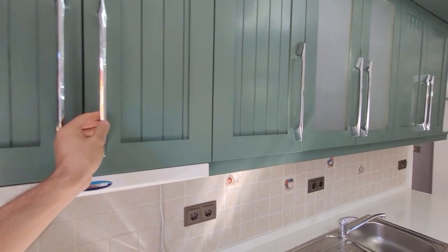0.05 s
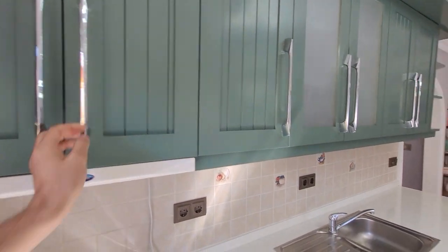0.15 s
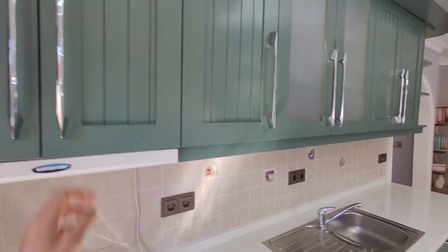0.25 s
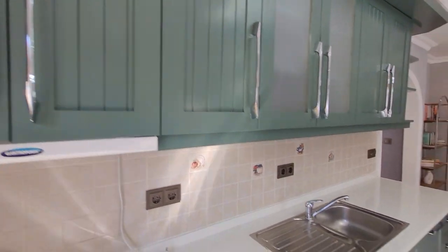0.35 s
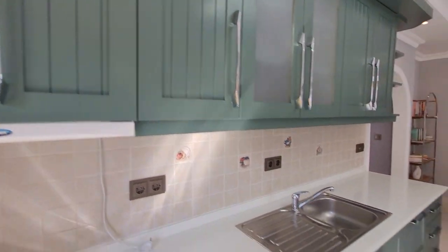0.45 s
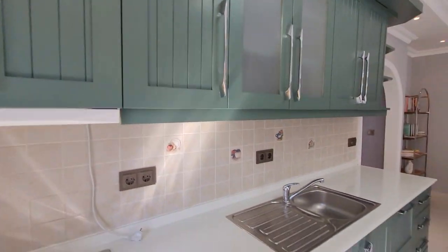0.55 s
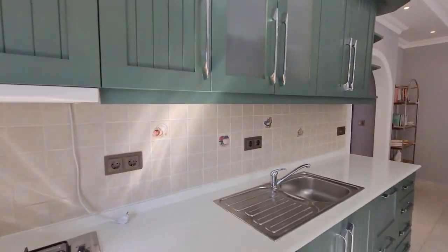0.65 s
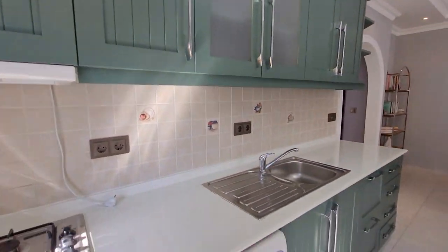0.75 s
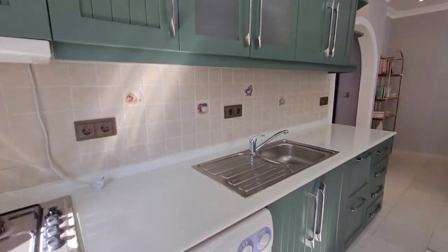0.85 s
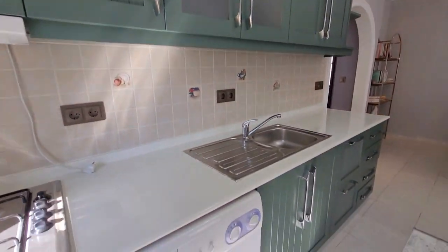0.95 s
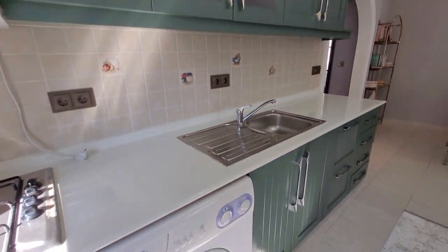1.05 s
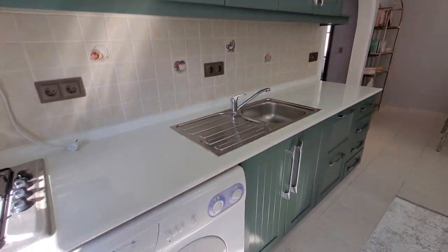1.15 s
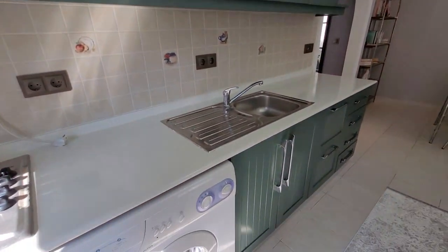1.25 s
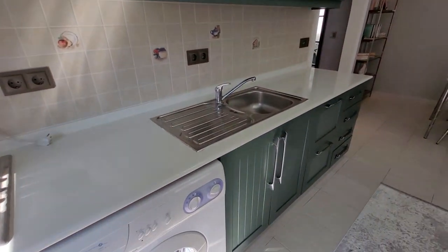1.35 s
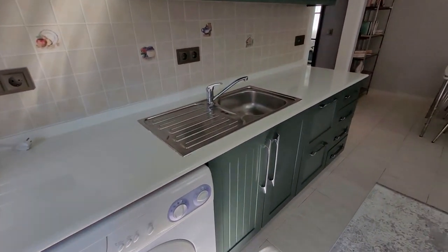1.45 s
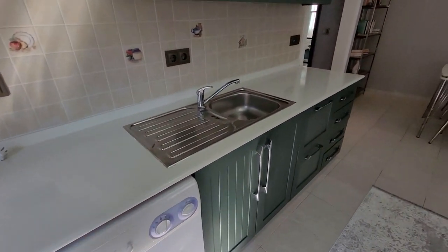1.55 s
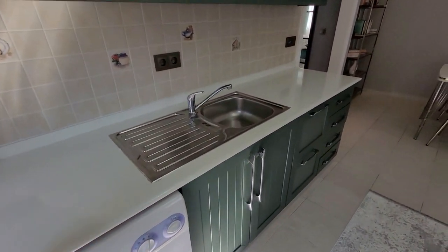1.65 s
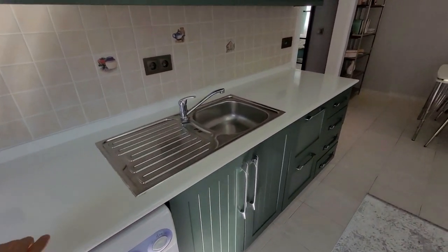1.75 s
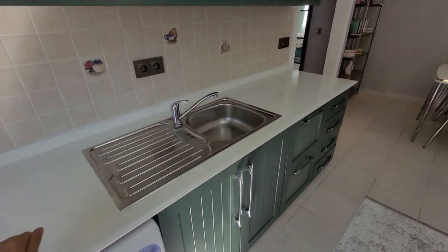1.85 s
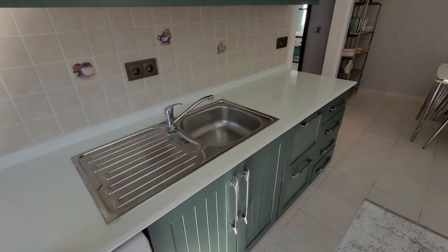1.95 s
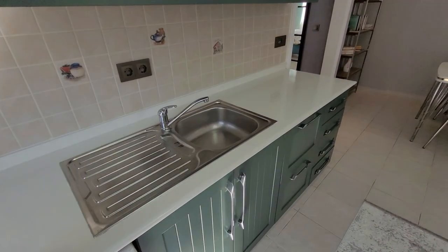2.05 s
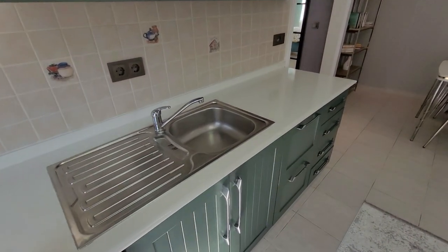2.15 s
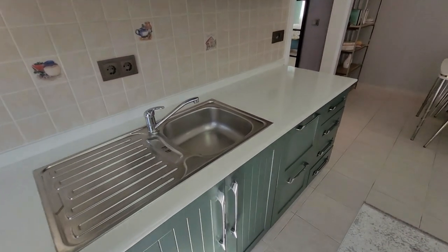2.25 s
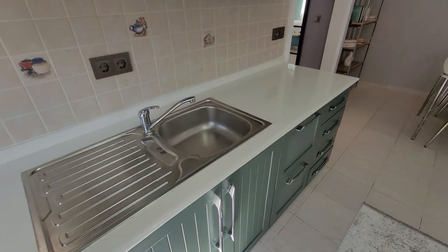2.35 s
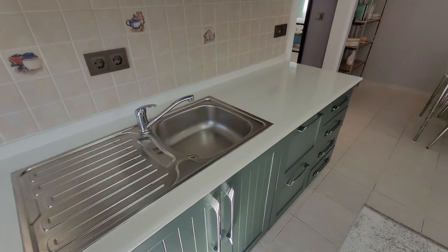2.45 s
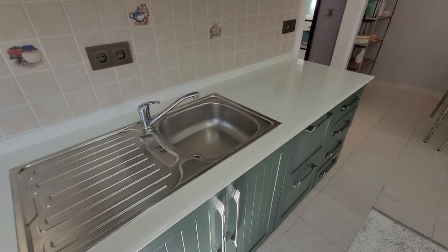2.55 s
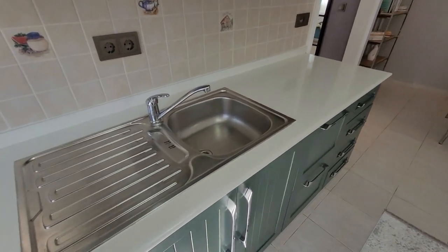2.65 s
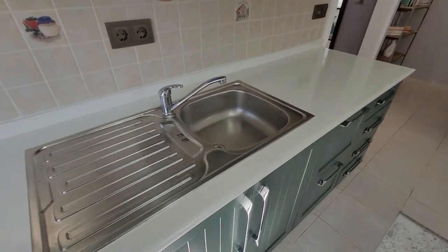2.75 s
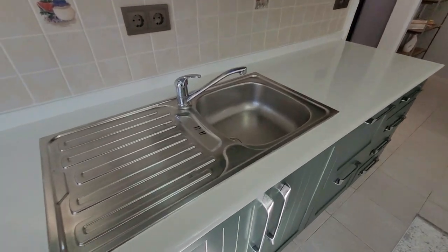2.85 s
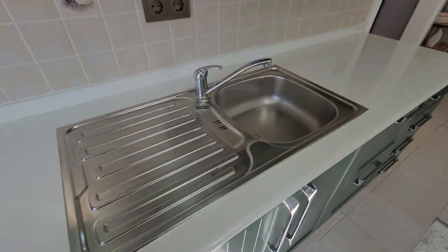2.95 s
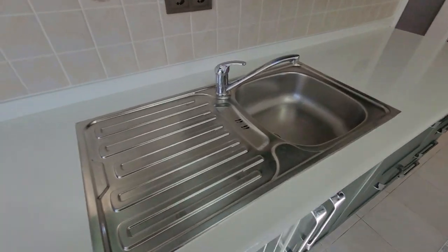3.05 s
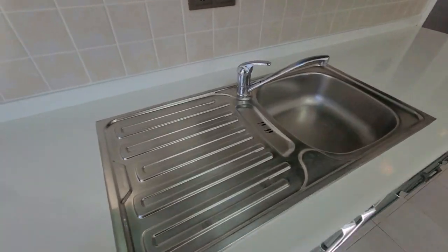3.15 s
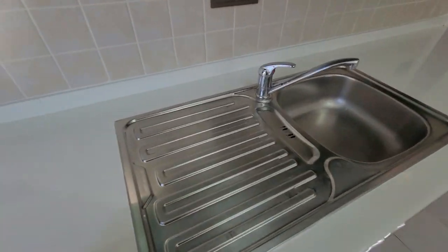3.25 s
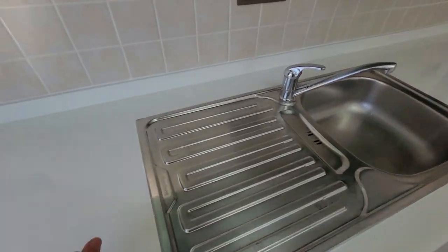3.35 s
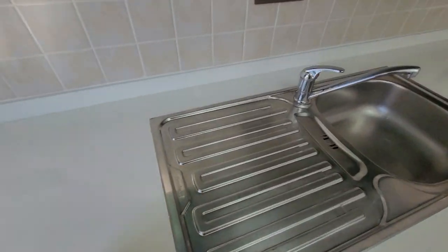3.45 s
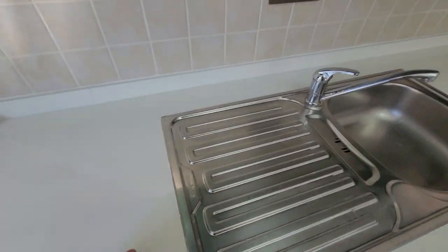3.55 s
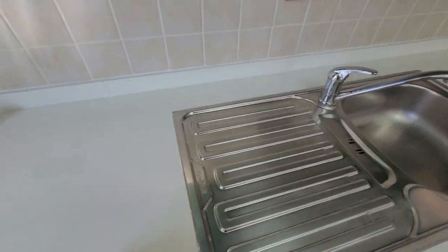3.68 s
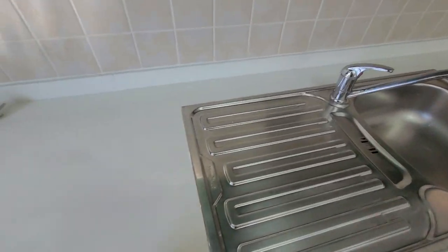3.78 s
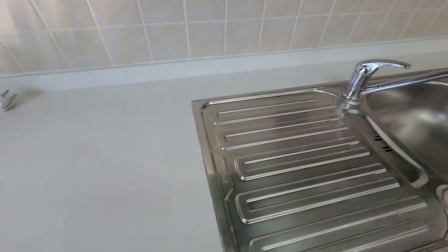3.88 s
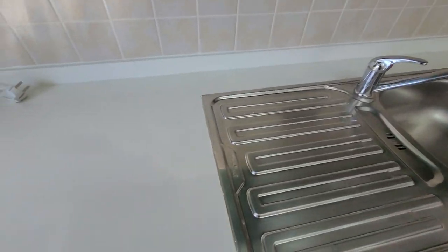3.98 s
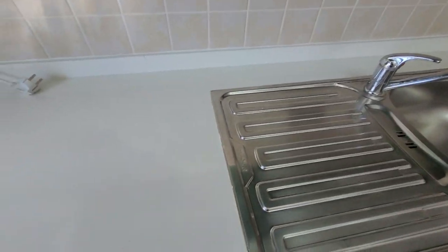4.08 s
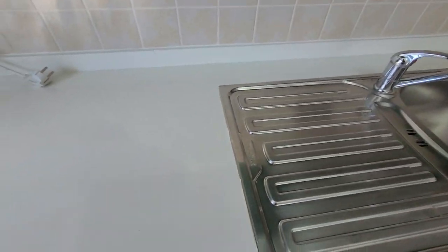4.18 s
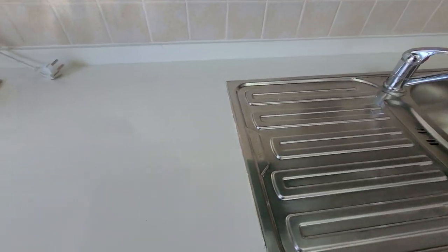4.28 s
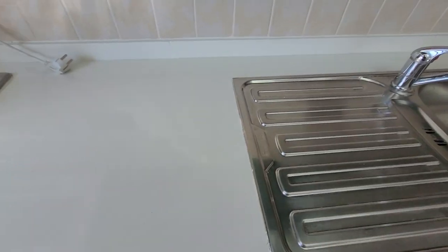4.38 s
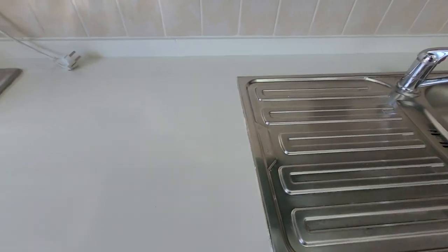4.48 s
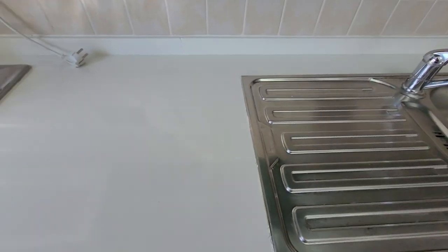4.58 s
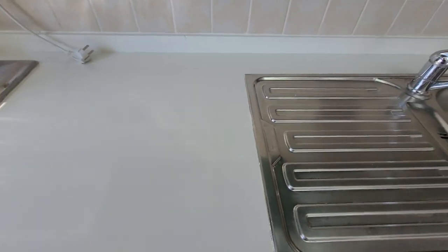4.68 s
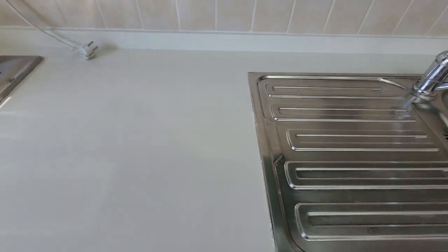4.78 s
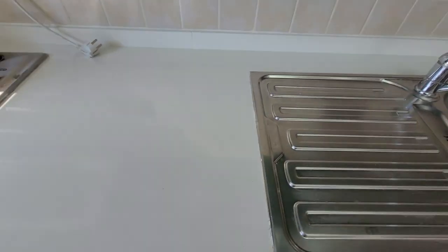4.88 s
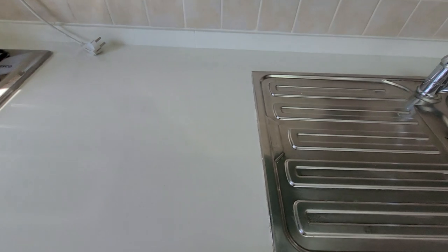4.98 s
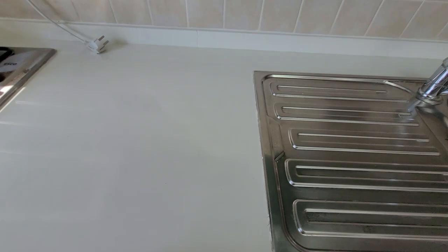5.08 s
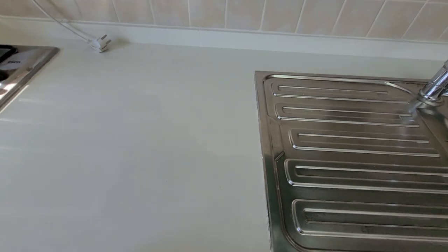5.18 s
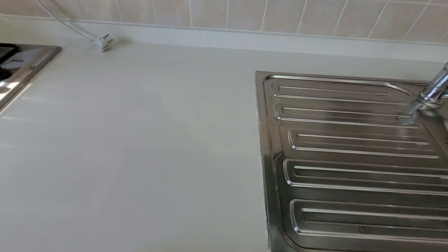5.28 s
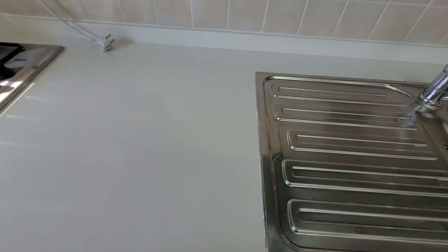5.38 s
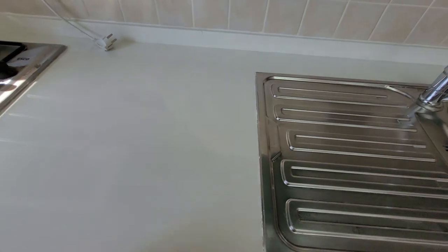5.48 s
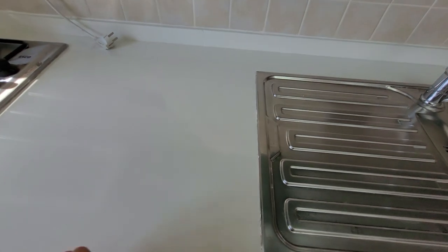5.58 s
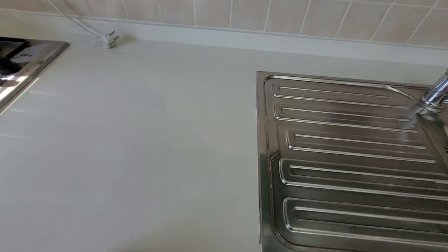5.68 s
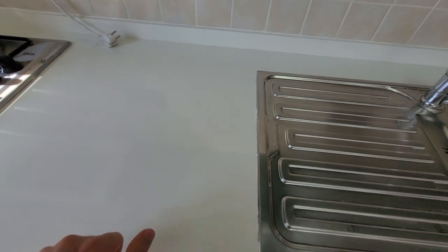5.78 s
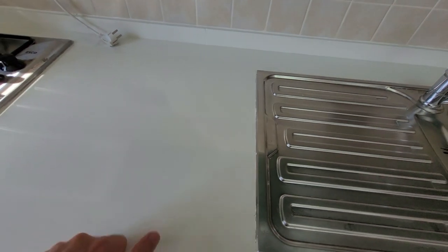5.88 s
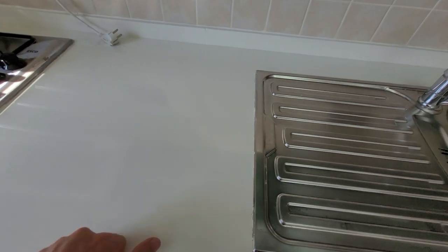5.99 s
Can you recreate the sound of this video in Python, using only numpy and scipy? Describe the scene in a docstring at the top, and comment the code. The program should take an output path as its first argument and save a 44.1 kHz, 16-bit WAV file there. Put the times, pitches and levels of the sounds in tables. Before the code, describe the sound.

Kitchen cupboard doors knock in spaced pairs after an opening low thud and puff of air, with faint rustles and distant rumble.

```python
"""Painted wooden cabinet doors knock shut in a tiled kitchen, over traffic rumble, a drone and hiss.
A wall door is already booming at the start: catches tick and its damper lets out air. Then three low doors
are knocked twice each, near 2.0, 3.5 and 5.8 s, amid ticks, rustles and soft footfalls.
Blows ring banks of panel modes; ticks ring wood, plastic and steel; all else is coloured noise under swells.
Knocks and ticks get a synthetic room tail, and a pair of microphone ports sets the final stereo."""
import sys
import numpy as np
from scipy import signal
from scipy.fft import rfft, irfft, next_fast_len
from scipy.io import wavfile
from scipy.ndimage import map_coordinates

SR = 44100
rng = np.random.default_rng(int(sys.argv[2]) if len(sys.argv) > 2 else 0)


def persist_wave(psi):
    """Save psi, clipped to +-1, as 16-bit WAV."""
    counts = np.round(np.clip(psi, -1, 1) * 32767).astype(np.int16)
    wavfile.write(sys.argv[1], SR, np.atleast_2d(counts).T)


N = 265790


def amp(db):
    """Decibels to linear gain."""
    return 10 ** (np.asarray(db) / 20)


def unit(x):
    """Scale to an rms of 1."""
    return x / np.sqrt(np.mean(x ** 2) + 1e-20)


def along(points, hz):
    """Read a curve of (hz, value) points, joined on a log frequency axis."""
    point_hz, value = np.transpose(points)
    return np.interp(np.log(hz + 1), np.log(point_hz + 1), value)


def wobble(rate):
    """A smooth random curve with rate knots a second."""
    knots = rng.standard_normal(int(N * rate / SR) + 4)
    return map_coordinates(knots, [np.arange(N) * rate / SR])


def swell(s, swell_s, fade_s, hold_s=0):
    """Gain that rises to 1 at time s, may hold, and dies away again."""
    edge_db, roundness = 20, 1.3  # a swell or fade time spans edge_db; roundness 1 = pointed top, 2 = round top
    t = np.arange(N) / SR - s
    fade = np.abs(np.maximum(t - hold_s, 0) / fade_s)
    return amp(-edge_db * np.where(t < 0, -t / swell_s, fade) ** roundness)


def filtered(x, response):
    """Multiply the spectrum of x by a complex response of frequency."""
    n = x.shape[-1]
    padded = next_fast_len(n + SR // 2)
    hz = np.fft.rfftfreq(padded, 1 / SR)
    return irfft(rfft(x, padded) * response(hz), padded)[..., :n]


def ringing(modes, f):
    """Causal response of (pitch_hz, width_hz, level_db) resonances, with alternating signs."""
    total = 0
    for k, (pitch, width, db) in enumerate(modes):
        resonance = 1j * f * width / (pitch * pitch - f * f + 1j * f * width)
        total = total + (-1) ** k * amp(db) * resonance
    return total


def burst(spectrum, delay, rise, t60):
    """One second holding a coloured noise burst that starts after delay and decays by 60 dB in t60 seconds."""
    t = np.maximum(np.arange(SR) / SR - delay, 0)
    noise = unit(filtered(rng.standard_normal(SR), lambda f: amp(along(spectrum, f))))
    return noise * amp(-60 * t / t60) * (1 - np.exp(-t / rise))


def diffuse(pair, spectrum):
    """Colour two unrelated noises and mix them into a left and right that agree most in the bass."""
    # left-right likeness of diffuse sound: pitch_hz, correlation (1 = identical)
    alike = [(40, 0.91), (120, 0.94), (300, 0.83), (600, 0.43), (1200, 0.18), (4000, 0.43), (15000, 0.1)]

    def mid_side(hz):
        turn = np.arccos(np.clip(along(alike, hz), -1, 1)) / 2
        return amp(along(spectrum, hz)) * [np.cos(turn), np.sin(turn)]

    mid, side = filtered(pair, mid_side)
    return np.array([mid + side, mid - side])


def rush(spectrum):
    """Steady coloured stereo noise of rms 1."""
    return unit(diffuse(rng.standard_normal((2, N)), spectrum))


def kitchen(x, wet_db):
    """Direct sound plus a fresh reverberant tail in which each frequency dies at its own speed."""
    # reverberation time of the tiled room: pitch_hz, t60_s
    decay = [(40, .9), (110, 0.75), (280, 0.63), (740, 0.56), (1940, 0.41), (5120, 0.39), (9000, 0.31),
             (15000, 0.22)]
    # strength of the room's answer: pitch_hz, level_db
    wet = [(40, -1), (65, -2), (100, 0.5), (300, -2), (2000, -2), (15000, -4)]
    hz, t, z = signal.stft(rng.standard_normal((2, SR)), SR, nperseg=512)
    dying = z * amp(-60 * t / along(decay, hz)[:, None])
    tail = signal.istft(dying, SR, nperseg=512)[1][:, :SR]
    scale = amp(wet_db) / np.linalg.norm(tail[0])
    build_up = 1 - np.exp(-np.arange(SR) / SR / 0.0013)  # the first walls are a metre or two away
    tail = diffuse(tail, wet) * build_up
    return x + scale * signal.fftconvolve(x[None], tail, axes=1)[:, :len(x)]


def add(out, s, sound):
    """Mix a stereo sound in at time s, which may lie before the start."""
    at = round(s * SR)
    sound = sound[:, max(-at, 0):]
    at = max(at, 0)
    out[:, at:at + sound.shape[1]] += sound[:, :out.shape[1] - at]


def knocks():
    """One corner lands, then the other; both shake the panel and crack the edge, and the handle buzzes."""
    # blows: start_s, blow_db, door_number, contact_softness_hz, edge_crack_db, handle_buzz_db, boom_db,
    # second_contact_delay_s, second_contact_db (against the first), pan_db (left minus right), room_db
    blows = [(-.02, -20.5, 0, 1500, -44, -70, -6.5, .02, -17.5, -2.5, 6),
             (2.030, -37.5, 1, 1800, -31, -41.5, -0.5, 0.013, 3.5, -2, 3.5),
             (2.292, -19.5, 1, 576.5, -50, -59.5, -3.5, .006, -14, -2, 4.5),
             (3.5345, -27.5, 2, 1800, -39.5, -56.5, 0.5, .011, -10.5, -1, 3),
             (3.75, -25, 2, 1110, -38, -37, 2.5, .005, -22, -2, -1),
             (5.7848, -26, 3, 956, -45.5, -46, 0.5, 0.00356, 6.5, -1, 2),
             (6.017, -21, 3, 1497, -55, -58, -10, 0.0027, 2, 0, 2)]
    # panel modes of each door, lowest first: pitch_hz, width_hz, level_db
    wall_door = [(58.2, 14, 12.5), (65.25, 13, 13), (103, 75, -14), (159, 23, -4), (223.1, 50, -10.5),
                 (378, 120, -10.5), (484, 30, -14), (544, 61, -13.5), (870, 170, -15), (1065, 330, -17),
                 (1640, 300, -27), (2460, 820, -39)]
    left_door = [(61.5, 20, -8), (134, 75, -7.5), (198.2, 75, -3), (219.8, 26, 0), (310, 50, -3.5),
                 (395, 51, -1.5), (489.3, 30, 2.5), (676, 42, 2), (920, 100, -7.5), (1167, 75, -4.5),
                 (1435, 270, -15), (1667, 97, -11), (2050, 110, -25), (2226, 55, -6.5), (2640, 110, -18.5),
                 (3300, 360, -20)]
    sink_door = [(64.7, 14, 1), (111.8, 16, -0.5), (185, 30, -7), (299.4, 45, -2.5), (387, 18, -2.5),
                 (448, 64, -0.5), (547, 70, 0.5), (630, 37, -25.5), (775, 290, -7.5), (1091, 49, 0),
                 (1240.5, 37, -1.5), (1610, 240, -5), (1842, 330, -6), (1990, 340, -9.5),
                 (2400, 290, -16.5)]
    end_door = [(51.6, 4.4, -0.5), (76, 33.6, -6), (116.1, 14, -4.5), (202, 150, -13), (275.8, 68, 3.5),
                (397, 180, -3), (533, 68, -3.5), (683, 41, -5), (814, 62, -8.5), (890, 190, -12),
                (1158, 42, -4.5), (1247, 96, -13.5), (1393, 54, -6.5), (1586, 110, -13.5), (2007, 88, -12),
                (2420, 480, -24.5)]
    # crack of the door edge: pitch_hz, relative_density_db (per Hz)
    edge_colour = [(900, -27.5), (1800, 0.5), (2500, -12.5), (3500, -13.5), (5000, -18.5), (8000, -22),
                   (12000, -27.5), (15800, -30.5)]
    # steel handle shivering on its screws: pitch_hz, relative_density_db (per Hz)
    buzz_colour = [(6000, -34.5), (9500, -12), (10800, -2.5), (13000, -6), (15800, -2.5)]
    doors = [wall_door, left_door, sink_door, end_door]
    out = np.zeros((2, N))
    for s, db, door, soft_hz, crack_db, buzz_db, boom_db, second_s, second_db, pan_db, room_db in blows:
        modes = np.array(doors[round(door)], float)
        modes[:2, 2] += boom_db  # the two lowest modes belong to the carcass behind the door
        contacts = np.zeros(SR)
        contacts[[0, round(second_s * SR)]] = 1, -amp(second_db)
        # a soft contact lasts longer, so it excites less treble
        panel = filtered(contacts, lambda f: ringing(modes, f) / (1 + 1j * f / soft_hz) ** 3)
        first_edge = burst(edge_colour, 0, rise=.0015, t60=0.039)
        second_edge = amp(second_db) * burst(edge_colour, second_s, rise=0.0066, t60=0.092)
        buzz = burst(buzz_colour, second_s, rise=0.01, t60=0.096)
        crack = amp(crack_db) * (first_edge + second_edge) + amp(buzz_db) * buzz
        knock = amp(db) * (amp(52) * panel + amp(26) * crack)
        pan = amp([[pan_db / 2], [-pan_db / 2]])
        add(out, s, kitchen(knock, room_db) * pan)
    return out


def ticks():
    """Catches and handles: one sharp slip rings wood and plastic catch, with a short chatter of steel."""
    # small ticks: start_s, level_db, wood_db, steel_db
    slips = [(0.045, -51.5, 9, 8.5), (0.0783, -49, 11, 8.5), (0.084, -71, 0, 9), (0.095, -56, 8, 9),
             (0.1276, -53, 12, -2.5), (1.688, -58.5, 15, 0), (1.719, -50, 9.5, -11.5),
             (3.226, -70, 24.5, 1.5), (3.2908, -67.5, 21, 0.5), (5.481, -85, 22, 2),
             (.248, -73.5, -3, 10.5), (3.71, -77, 6, 10)]
    # resonances of wood, plastic catch and steel: pitch_hz, width_hz, level_db
    wood = [(451.7, 170, 8.5), (1150, 150, 5)]
    catch = [(2860, 430, 10), (3230, 480, 11.5)]
    steel = [(5500, 720, -16), (7150, 1900, -7), (9670, 1000, -6), (14530, 2800, -8)]
    chatter_t60_s, room_db = 0.0098, -14.5  # the steel chatters briefly before it grips
    out, t = np.zeros((2, N)), np.arange(SR // 2) / SR
    slip = -1. * (t == 0)
    for s, db, wood_db, steel_db in slips:
        chatter = rng.standard_normal(len(t)) * amp(-60 * t / chatter_t60_s)
        chatter = chatter / np.linalg.norm(chatter)

        def dull(f):
            return (amp(wood_db) * ringing(wood, f) + ringing(catch, f)) / (1 + 1j * f / 4000) ** 2

        dull_tick = filtered(slip, dull)
        steel_tick = filtered(chatter, lambda f: ringing(steel, f))
        tick = amp(db + 26) * (dull_tick + amp(steel_db) * steel_tick)
        add(out, s, kitchen(tick, room_db))
    return out


def damper():
    """The wall door's hinge damper lets out its air: narrow noise in uneven puffs."""
    # air leaving the damper: pitch_hz, relative_density_db (per Hz)
    nozzle = [(1350, -25), (1600, -2), (1720, -3), (1830, 3), (2100, -50.5)]
    level_db = -62.5
    puffs = amp(1.5 * wobble(50))
    return amp(level_db) * swell(0.16, swell_s=.15, fade_s=0.11, hold_s=0.235) * puffs * rush(nozzle)


def rustles():
    """Sleeve, swinging doors and slippers rub a little unevenly: noise in a body and a treble band."""
    # separate rustles: loudest_s, swell_s, fade_s, body_db, treble_db
    rubs = [(0, .05, 0.16, -37, -78), (0.248, 0.21, 0.156, -59, -74), (.42, 0.19, 0.127, -65, -100),
            (.73, 0.15, 0.16, -77, -74), (1.55, 0.22, 0.33, -87, -80.5), (1.82, 0.21, 0.2, -68.5, -76),
            (2.2, 0.13, 0.25, -51.5, -65), (2.58, 0.21, 0.097, -79.5, -78.5),
            (2.858, .05, 0.12, -81, -67.5), (3.05, 0.13, 0.11, -101.5, -86),
            (3.359, 0.26, 0.26, -71.5, -81), (4.305, .015, 0.049, -93, -79),
            (4.388, 0.014, 0.047, -94.5, -78.5), (4.57, 0.094, 0.16, -85, -93),
            (4.85, 0.073, 0.085, -95, -94), (5.165, 0.013, 0.047, -81, -77), (5.47, 0.066, 0.1, -74, -82)]
    # body of the rubbing: pitch_hz, relative_density_db (per Hz)
    cloth = [(200, -33.5), (500, -1), (1100, -1.5), (1700, -2), (2400, -5.5), (4000, -12.5), (5300, -17.5),
             (6500, -34.5)]
    # treble of the rubbing: pitch_hz, relative_density_db (per Hz)
    fizz = [(1500, -1.5), (3000, 9.5), (4000, 13), (6000, 11.5), (9000, 9), (13000, 3.5), (15800, -10)]
    body, treble = sum(swell(s, up, down) * amp([[body_db], [treble_db]])
                       for s, up, down, body_db, treble_db in rubs)
    grain = amp(1.6 * wobble(45))
    return grain * (body * rush(cloth) + treble * rush(fizz))


def rumble():
    """Far traffic as unsteady low noise, swelling further with footfalls felt through the floor."""
    # footfalls: loudest_s, level_db
    footfalls = [(.68, -77.5), (1.579, -67.5), (3.25, -60), (4.381, -64), (4.579, -79), (5.25, -73.5),
                 (5.45, -69), (5.68, -79.5)]
    # low rumble: pitch_hz, relative_density_db (per Hz)
    colour = [(12, -84), (20, -20), (65, 7), (118, -14), (146, -10), (170, -15), (220, -12), (370, -120)]
    traffic_db = -78.5
    steps = sum(amp(db) * swell(s, swell_s=0.16, fade_s=0.41) for s, db in footfalls)
    lumps = amp(3 * wobble(8))
    return (amp(traffic_db) + steps) * lumps * rush(colour)


def drone():
    """An unsteady hum through the walls: coloured noise that changes level and side."""
    # level and side of the hum over time: time_s, level_db, pan_db (left minus right)
    path = [(0, -44, 8), (.6, -70, 0), (.9, -73, 0), (1.3, -69, 1.5), (1.58, -65.5, 1.5), (1.9, -63, 5),
            (2.3, -73.5, -4), (3.1, -67, 2), (3.25, -59.5, 1), (3.45, -61, -3), (4.25, -70.5, -1),
            (4.55, -68.5, -1), (4.85, -71, 1), (5.45, -69.5, 2), (6.03, -72, -1)]
    # hum of the flat: pitch_hz, relative_density_db (per Hz)
    colour = [(76, -39.5), (130, -6.5), (162, -7), (188, -19.5), (266, -5), (391, -4), (618, -15),
              (665, -17.5), (1060, -23), (1980, -34.5), (2500, -63.5), (3250, -64), (5500, -120)]
    time_s, level_points, pan_points = np.transpose(path)
    t = np.arange(N) / SR
    level_db = np.interp(t, time_s, level_points)
    pan_db = np.interp(t, time_s, pan_points)
    return amp(level_db + [pan_db / 2, -pan_db / 2] + 0.96 * wobble(13.0)) * rush(colour)


def hiss():
    """Steady self-noise of the microphone."""
    # self-noise: pitch_hz, relative_density_db (per Hz)
    colour = [(900, -9), (1700, -7), (2300, -7.5), (3200, -11), (5000, -14), (7000, -9.5), (9500, -10),
              (12000, -12), (15800, -19)]
    level_db = -83
    return amp(level_db) * rush(colour)


def scene():
    """Doors in front, small handling sounds around them, the flat behind."""
    return knocks() + ticks() + damper() + rustles() + rumble() + drone() + hiss()


def record(dry):
    """Two ports differ in tone and, below the treble, in arrival time; nothing passes the band limit."""
    # tone of the microphone pair: pitch_hz, left_minus_right_db
    lean = [(40, 1.5), (1000, 1), (4000, 1), (9000, 0), (15000, 8)]
    lag_s, top_hz = .00022, 15850  # the left port hears everything a little earlier
    sides = np.array([[1], [-1]])

    def ports(hz):
        lead = np.pi * hz * lag_s / (1 + (hz / 1900) ** 2)  # radians; short waves scatter round the housing
        return amp(sides * along(lean, hz) / 2) * np.exp(1j * sides * lead) * (hz < top_hz)

    return filtered(dry, ports)


dry = scene()
out = record(dry)
persist_wave(out)
```